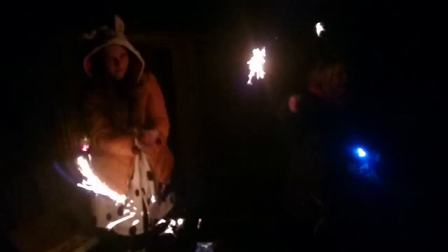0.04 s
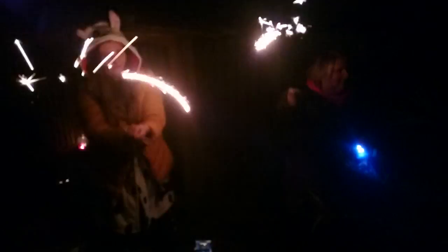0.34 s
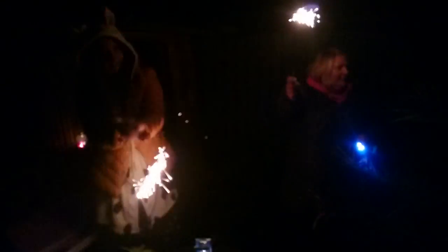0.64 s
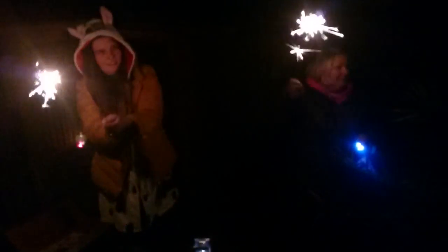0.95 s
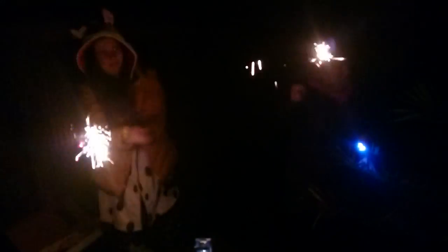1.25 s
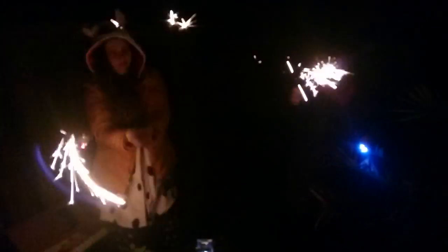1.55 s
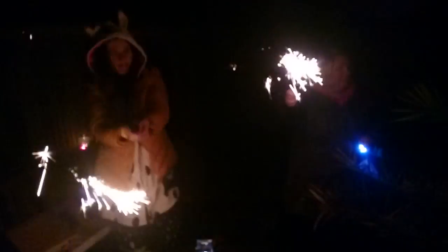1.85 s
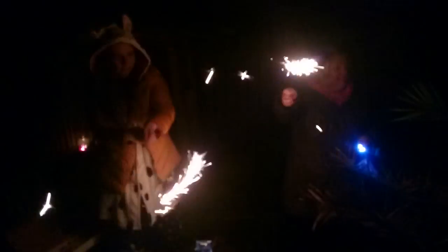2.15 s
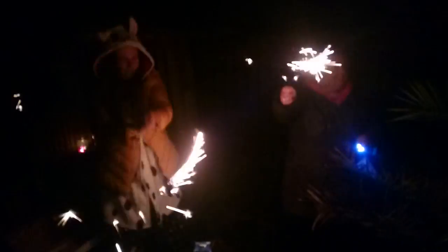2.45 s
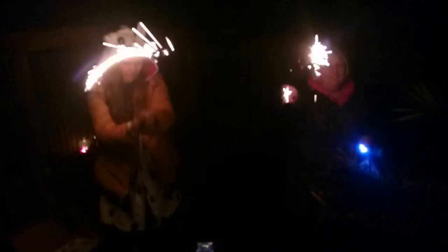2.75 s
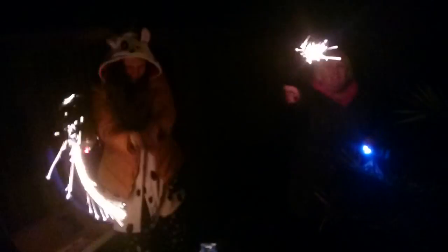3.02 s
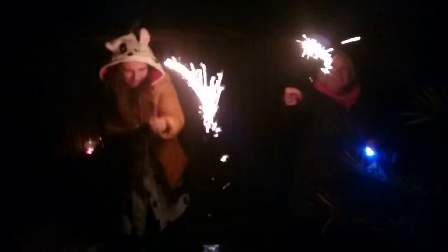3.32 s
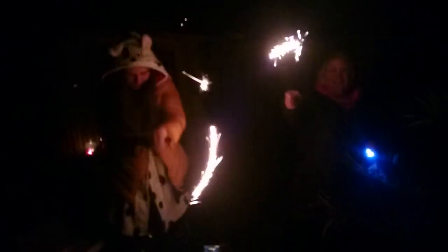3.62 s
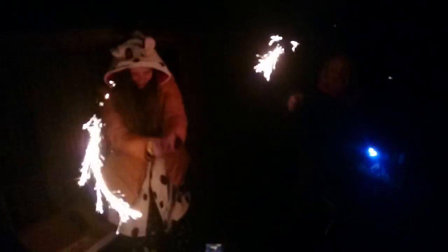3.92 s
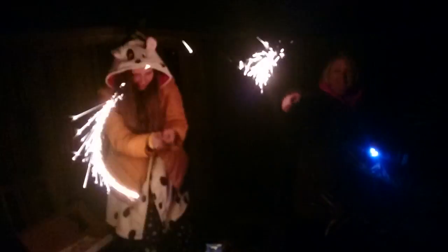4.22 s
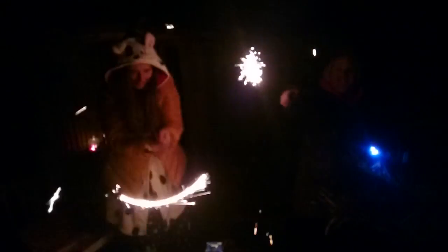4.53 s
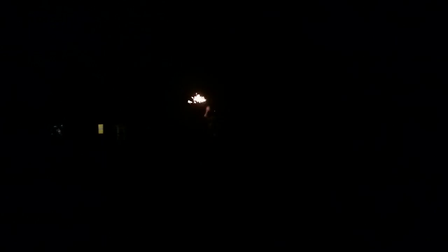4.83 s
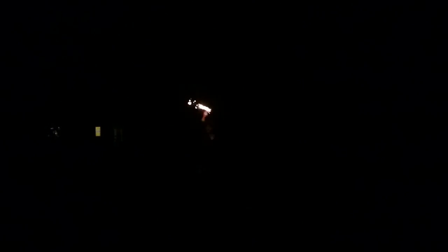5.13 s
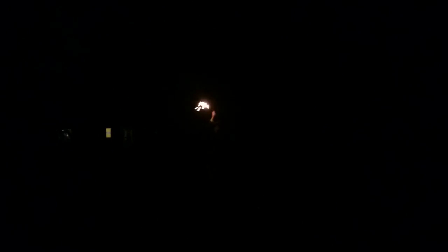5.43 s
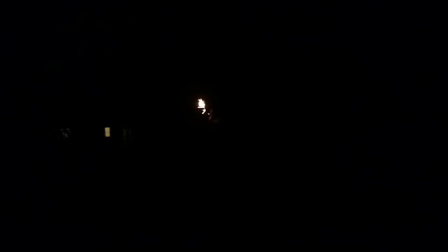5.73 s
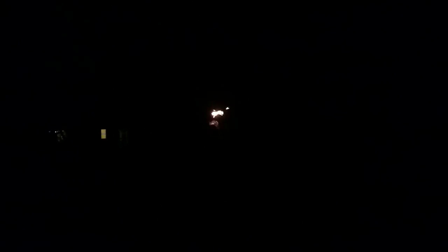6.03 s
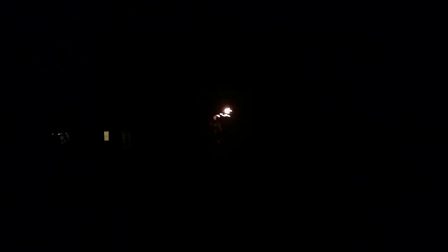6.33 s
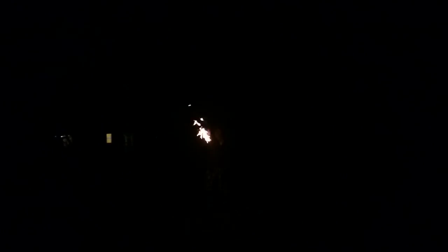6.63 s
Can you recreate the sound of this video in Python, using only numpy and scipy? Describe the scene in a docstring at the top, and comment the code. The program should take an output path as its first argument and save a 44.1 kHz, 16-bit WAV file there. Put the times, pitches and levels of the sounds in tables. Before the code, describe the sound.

Two sparklers fizz and crackle close by outdoors, with sharp little pops, then abruptly just one sputters further away.

```python
"""A garden at night, on a stereo microphone. Two hand-held sparklers burn close by: metal grains burst in
crackles and pops, and as the coating flares, gas rushes out and whistles through narrow vents. Then the scene
changes: one sparkler fizzes further off, with a few sharp pops. Distant traffic murmurs behind, light air
nudges the two microphone ports, and each port colours the sound in its own way."""
import sys
import numpy as np
from scipy import signal
from scipy.fft import rfft, irfft, next_fast_len
from scipy.io import wavfile

SR = 44100
rng = np.random.default_rng(int(sys.argv[2]) if len(sys.argv) > 2 else 0)


def bounce(signal):
    """Save signal as a 16-bit WAV file at the path given by the first command-line argument."""
    frames = np.transpose(np.atleast_2d(signal))
    limited = np.clip(frames, -1, 1)
    pcm = np.round(limited * 32767).astype(np.int16)
    wavfile.write(sys.argv[1], SR, pcm)


N = 294147
TIME = np.arange(N) / SR
CUT_S = 4.757   # the close scene gives way to the far one
CUTOFF_HZ = 15750   # top of the microphone's range
FIZZ_ATTACK_S, FIZZ_RELEASE_S = 0.0078, 0.021
JET_ATTACK_S, JET_RELEASE_S = 0.051, 0.12   # the gas builds and dies more slowly than the fizz

# Colour of the close sparklers at the ports: (frequency [Hz], left [relative dB], right [relative dB])
NEAR_COLOUR = [(1030, -31, -13), (1850, -16.5, -4.5), (2770, -14.5, -11.5), (3530, -9.5, -10),
               (4000, -17.5, -7), (4840, -18, -9), (5570, -9.5, -11.5), (6520, 0.5, -16.5), (6810, -3, -12),
               (7960, -5.5, -21.5), (9340, 1.5, -14.5), (10690, -10.5, -10), (11700, -15.5, -8.5),
               (13000, -25, -13), (16400, -21, -16)]


def near_sparklers():
    """Two sparklers close to the microphone: fizz, pops, and gas rushing in one broad resonance."""
    burn_db = flaring(-49.5, "fizz", FIZZ_ATTACK_S, FIZZ_RELEASE_S)
    jet_db = flaring(-63.5, "jet", JET_ATTACK_S, JET_RELEASE_S)
    ports = port_response(NEAR_COLOUR)
    burst = grains(low_hz=3480, split_hz=6500, per_s=2500, spread_db=9.5, largest=1.66, spurt_db=2.0)
    crackle = garden(burst, echo_db=-1.0, t60=0.47) * stereo_gain(0, -2)
    burning = fizz(burn_db, crackle, hiss_db=0.5, sputter_db=0.58)
    rows = [row for row in popping_sparks() if row[0] < CUT_S]
    popping = pops(rows, ports, top_hz=9000, echo_db=2.0, t60=0.11, lag_s=0.0001)
    rush = noise_band(centre_hz=3860, width_hz=1200)
    jet = rush * from_db(jet_db + drift(27)) * stereo_gain(-22, 0)
    return through(burning + popping, ports) + jet


# Colour of the far sparkler at the ports: (frequency [Hz], left [relative dB], right [relative dB])
FAR_COLOUR = [(990, -10, -6.5), (2030, -16.5, -1), (3020, -5.5, -6), (3560, -12, -0.8), (4860, -28, -2),
              (5360, -14.5, -5.5), (5860, -3.5, -11), (6730, 1.5, -10), (7600, -2.5, -19), (9360, -4, -9.5),
              (10200, -9, -10), (11600, -11.5, -5.5), (13100, -18, -7.5), (16300, -15, -17)]


def far_sparkler():
    """One sparkler further off: duller, with sparser crackle; its jet does not carry this far."""
    burn_db = flaring(-50, "fizz", FIZZ_ATTACK_S, FIZZ_RELEASE_S)
    ports = port_response(FAR_COLOUR)
    burst = grains(low_hz=1480, split_hz=4400, per_s=1800, spread_db=4.5, largest=4.0, spurt_db=5.0)
    crackle = garden(burst, echo_db=0.5, t60=0.23) * stereo_gain(-2.5, 0)
    burning = fizz(burn_db, crackle, hiss_db=4.0, sputter_db=0.5)
    rows = [row for row in popping_sparks() if row[0] >= CUT_S]
    popping = pops(rows, ports, top_hz=11100, echo_db=-11, t60=0.021, lag_s=.00005)
    return through(burning + popping, ports)


# Flares of the coating: (start [s], length [s], fizz level [dB], jet level [dB])
FLARES = [(0.05, 0.087, -52.5, -68), (0.17, 0.049, -53, -60), (0.33, 0.11, -48, -62),
          (0.38, 0.021, -47, -66), (0.476, 0.058, -52, -70), (0.613, 0.098, -51, -60),
          (0.743, 0.056, -47.5, -58), (.835, .04, -53, -66), (0.908, 0.049, -47, -66),
          (1.007, 0.026, -49.5, -68), (1.085, .03, -51, -68), (1.14, .025, -50.5, -64),
          (1.26, 0.12, -52, -65), (1.41, 0.079, -49.5, -53.5), (1.527, 0.2, -52.5, -65),
          (1.775, 0.11, -47.5, -55), (1.883, 0.097, -47, -51), (2.038, 0.035, -46, -64),
          (2.096, 0.084, -50.5, -57), (2.19, 0.086, -48, -54), (2.37, 0.18, -50.5, -55),
          (2.63, 0.12, -62, -72), (2.942, 0.12, -50.5, -55), (3.063, 0.21, -47.5, -55),
          (3.277, 0.086, -46.5, -63), (3.377, 0.079, -51.5, -56), (3.52, .17, -60, -61),
          (3.718, 0.23, -49.5, -61), (3.96, 0.3, -54, -59), (4.202, 0.35, -52.5, -58.5),
          (4.66, 0.084, -52.5, -66), (4.787, 0.17, -52.5, -74), (5.275, 0.12, -55.5, -70),
          (5.434, 0.033, -49, -70), (5.588, 0.079, -49.5, -70), (6.192, 0.16, -53, -70),
          (6.357, 0.29, -52, -70)]


def flaring(steady_db, part, attack_s, release_s):
    """Level in dB of the "fizz" or the "jet": each flare adds its power to the steady burn."""
    power = from_db(steady_db) ** 2
    for start_s, length_s, fizz_db, jet_db in FLARES:
        gain = from_db(fizz_db if part == "fizz" else jet_db)
        power = power + (gain * swell(start_s, length_s, attack_s, release_s)) ** 2
    return 10 * np.log10(power)


def fizz(burn_db, crackle, hiss_db, sputter_db):
    """Crackle over the smooth hiss of escaping gas; both sputter together."""
    hiss = from_db(hiss_db) * rng.standard_normal((2, N))
    return rms_one(crackle + hiss) * from_db(burn_db + sputter_db * drift(7.3))


def grains(low_hz, split_hz, per_s, spread_db, largest, spurt_db):
    """Coarse grains crack low and fine ones high, each in their own time; both radiate little bass."""
    coarse, fine = (sparks(per_s, spread_db, largest, spurt_db) for _ in range(2))
    both = low_pass(coarse, split_hz, order=1) + high_pass(fine, split_hz, order=1)
    return rms_one(high_pass(both, low_hz, order=1))


def sparks(per_s, spread_db, largest, spurt_db):
    """Metal grains burst at random, in spurts: countless tiny ones, fewer large."""
    at = np.flatnonzero(rng.random(N) < per_s * from_db(spurt_db * drift(50)) / SR)
    sizes_db = spread_db * np.minimum(rng.exponential(1, N), largest)
    clicks = (from_db(sizes_db) * rng.choice([-1, 1], N))[at]
    # sparks fly all ways, so each has its own lag between the ports
    lags = (rng.uniform(-.0004, .0004, N) * SR).astype(int)[at]
    out = np.zeros((2, N))
    out[0, at] = clicks
    out[1, np.clip(at + lags, 0, N - 1)] = clicks
    return rms_one(out)


# Loudest sparks: (time [s], direct peak at the louder port [dB], low edge [Hz], right over left [dB])
LOUD_POPS = [(.2537, -24, 7000, -12), (.4916, -24, 7000, -9), (.506, -29, 7000, -5),
             (0.5383, -27, 7000, -5), (0.845, -29, 5000, 1), (1.3389, -25, 7100, -3),
             (1.4002, -26, 9100, 3), (1.581, -23, 6900, -3), (1.5868, -30, 6900, -3),
             (1.6354, -25.5, 7000, -7), (1.6605, -24.5, 7000, -4), (2.1196, -27, 5000, 3),
             (2.1264, -30, 2010, 7), (2.2636, -28, 6000, -8), (2.272, -29.5, 1000, 8),
             (2.4024, -36, 7000, -6), (2.538, -25, 7000, -3), (3.0883, -24.5, 7000, -9),
             (3.1238, -29, 7000, -5), (3.386, -25, 7000, 2), (3.7954, -30, 5000, 4),
             (3.8337, -32, 6000, -6), (4.0104, -32, 7000, 3), (4.276, -32, 2000, 8),
             (4.4278, -27.5, 5000, 0), (4.6814, -23, 6500, 2), (4.8833, -28, 2200, 5),
             (5.029, -25.5, 6000, 4), (5.0546, -31, 5000, -4), (5.1898, -28.5, 2000, 13),
             (5.2358, -29.5, 2000, 3), (5.3738, -19.5, 1600, 3), (5.4568, -33, 3000, 5),
             (5.5838, -34, 900, -5), (5.6388, -27, 2000, -2), (6.0315, -36, 2500, 7),
             (6.1369, -26.5, 2600, 0), (6.3103, -26.5, 1800, 10), (6.4843, -37, 4000, 2),
             (6.5905, -31, 4000, -2), (6.6054, -27, 4000, 2)]


def popping_sparks(per_s=6, peak_db=-37, spread_db=1.2, low_hz=5000):
    """Rows for the loud pops, plus lesser sparks that burst at random with these settings."""
    at = np.flatnonzero(rng.random(N) < per_s / SR)
    peaks_db = peak_db + spread_db * rng.standard_normal(N)
    return LOUD_POPS + [(i / SR, peaks_db[i], low_hz, 0) for i in at]


def pops(rows, ports, top_hz, echo_db, t60, lag_s):
    """A large spark bursts with one rounded pressure spike; some are thin ticks, others reach lower."""
    out = np.zeros((2, N))
    spike = low_pass(signal.unit_impulse(SR // 200), top_hz, order=1)
    for time_s, peak_db, low_hz, right_db in rows:
        crack = high_pass(spike, low_hz) * stereo_gain(0, right_db)
        peak_at_ports = np.abs(signal.fftconvolve(crack, ports, axes=1)).max()
        add_at(out, time_s, from_db(peak_db) / peak_at_ports * crack)
    out[1] = np.roll(out[1], int(lag_s * SR))
    return garden(out, echo_db, t60)


# Gas whistling through narrow vents in the coating: (start [s], length [s], level [dB], pitch [Hz])
WHISTLES = [(0.314, 0.07, -47, 4100), (.46, 0.26, -55.5, 4330), (2.887, 0.19, -51, 4300),
            (3.06, 0.29, -49.5, 4295), (4.957, 0.091, -54, 14000)]


def whistles(overtone_ratio=2.3, overtone_db=-6):
    """Each vent sings in a narrow, wavering resonance on the right; a weak overtone reaches both ports."""
    out = 0
    waver = 1 + .012 * drift(14.3)
    for start_s, length_s, level_db, pitch_hz in WHISTLES:
        tone = noise_band(pitch_hz * waver, width_hz=0.18 * pitch_hz) * stereo_gain(-24, 0)
        overtone_hz = overtone_ratio * pitch_hz
        if overtone_hz < CUTOFF_HZ:
            tone = tone + from_db(overtone_db) * noise_band(overtone_hz * waver, width_hz=800)
        out = out + from_db(level_db) * swell(start_s, length_s, JET_ATTACK_S, JET_RELEASE_S) * tone
    return out


def garden(x, echo_db, t60):
    """Direct sound plus scatter from coats, ground and fence; moving sparks each have their own echoes."""
    retained = from_db(-60 / (t60 * SR)) ** 2   # share of the energy left after one sample
    energy = signal.lfilter([1 - retained], [1, -retained], np.square(x) + 1e-18)
    echoes = rms_one(rng.standard_normal((2, N)) * (rng.random((2, N)) < .2))
    return x + from_db(echo_db) * np.sqrt(energy) * echoes


# Distant cars: (time when nearest [s], level on the right [dB], time to cover their own distance [s],
# centre of the tyre noise [Hz], upper hiss against that noise [dB])
CARS = [(1.74, -53.5, .85, 928.6, -7), (4.5, -52.5, 1.2, 1049, -13.5)]


def tyres(fall_db_per_decade=43, glide=.05):
    """Far cars on the right: the road noise of each swells as it nears, then sinks in pitch and fades."""
    out = 0
    for nearest_s, level_db, pass_s, centre_hz, hiss_db in CARS:
        along = (TIME - nearest_s) / pass_s
        distance = np.hypot(1, along)   # 1 at the nearest point
        road = noise_band(centre_hz * (1 - glide * along / distance), width_hz=280)
        hiss = from_db(hiss_db) / distance ** 2 * noise_band(centre_hz=1710, width_hz=620)
        out = out + (road + hiss) * from_db(level_db - fall_db_per_decade * np.log10(distance))
    return out * stereo_gain(-13, 0)


# Night air and distant traffic behind the close pair, and behind the far sparkler:
# (frequency [Hz], left [relative dB], right [relative dB])
NIGHT_NEAR = [(25.0, -47, -29), (48.3, -8.5, -19.5), (88.5, -7.5, -10.5), (190, -18, -18),
              (242, -15.5, -12.5), (388, -16.5, -14), (513, -12.5, -9.5), (723, -12.5, -2),
              (1050, -9.5, -2.5), (1340, -12, -5), (1634, -10.5, -3.5), (1910, -21.5, -14.5),
              (3000, -21.5, -15), (6340, -41, -31.5)]
NIGHT_FAR = [(25, -36, -28), (50.0, 0, -15), (88.5, -2.5, -8), (182, -13.5, -12.5), (256, -13, -7),
             (387, -11, -14.5), (540, -12.5, -6), (700, -8, -0.8), (1060, -12, 0.5), (1210, -18, -4),
             (1480, -9, 1.5), (2040, -12, -9.5), (3170, -14, -23), (6130, -49, -25)]
# Likeness of the night air at the two ports: (frequency [Hz], correlation [-1 to 1])
PORT_LIKENESS = [(50, -0.67), (260, -0.84), (620, -0.6), (850, -0.42), (1050, 0.86), (1450, 0.69),
                 (1800, 0.47), (2250, -.95)]


def night(spectrum, level_db):
    """Steady outdoor murmur, partly alike and partly opposed in the two ports."""
    size = next_fast_len(N)
    alike = np.clip(at_hz(PORT_LIKENESS, bin_hz(size))[0], -.95, .95)
    mid, side = rfft(rng.standard_normal((2, size)))
    left_right = np.sqrt(1 + alike) * mid + np.sqrt(1 - alike) * side * [[1], [-1]]
    murmur = rms_one(irfft(left_right, size)[:, :N])
    return from_db(level_db) * through(murmur, port_response(spectrum))


# Air puffs and small knocks on the microphone housing: (time [s], left peak [dB], decay [s], top [Hz])
BUMPS = [(0.789, -59, .012, 150), (3.305, -57, 0.011, 284), (4.128, -54, 0.014, 80),
         (4.383, -56, 0.023, 100), (4.669, -42.5, 0.016, 276), (4.791, -56, 0.06, 75),
         (4.897, -59, .015, 85), (5.773, -57, .025, 85), (6.345, -58, .02, 110), (6.635, -55, 0.024, 90)]


def bumps():
    """Short low thuds right at the microphone, a push followed by a flutter, mostly at the left port."""
    out = np.zeros((2, N))
    t = TIME[:SR // 5]
    for time_s, peak_db, decay_s, top_hz in BUMPS:
        pressure = 0.038 * rng.standard_normal((2, len(t))) * np.exp(-t / decay_s)
        pressure[:, 0] = 1   # the push
        thud = high_pass(low_pass(pressure, top_hz, order=3), 52)
        add_at(out, time_s, from_db(peak_db) * thud / np.abs(thud).max(axis=1, keepdims=True))
    return out * stereo_gain(0, -9)


# Faint whine of the electronics: (frequency [Hz], level before the left and right gains [dB])
WHINE_TONES = [(14547, -77.5), (14577, -77.5)]


def whine():
    """Two thin, slightly unsteady tones from the electronics, stronger on the right."""
    out = 0
    for hz, level_db in WHINE_TONES:
        phase = 2 * np.pi * np.cumsum(hz + 5 * drift(11)) / SR
        out = out + from_db(level_db) * np.sin(phase)
    return out * stereo_gain(-5, 4)


def microphone_hiss(left_db, right_db):
    """Steady self-noise of the microphone's two channels."""
    return rng.standard_normal((2, N)) * stereo_gain(left_db, right_db)


def port_response(spectrum, size=4096):
    """Causal impulse responses of both ports for a spectrum that falls away past its ends."""
    hz = bin_hz(size)
    skirts = np.minimum(hz / spectrum[0][0], 1) ** 2 * np.minimum(spectrum[-1][0] / hz, 1) ** 2
    gain = rms_one(from_db(at_hz(spectrum, hz)) * skirts)
    cepstrum = irfft(np.log(gain + 1e-4))
    cepstrum[:, 1:size // 2] *= 2   # folding onto positive time gives minimum phase
    cepstrum[:, size // 2 + 1:] = 0
    return irfft(np.exp(rfft(cepstrum)))


def through(x, response):
    """Convolve with a stereo impulse response."""
    return signal.fftconvolve(x, response, axes=1)[:, :N]


def noise_band(centre_hz, width_hz):
    """Stereo noise in one resonance, whose centre may move."""
    swing = low_pass(rng.standard_normal((2, N)) + 1j * rng.standard_normal((2, N)), width_hz / 2)
    carrier = np.exp(2j * np.pi * np.cumsum(centre_hz * np.ones(N)) / SR)
    return rms_one(np.real(swing * carrier))


def swell(start_s, length_s, attack_s, release_s):
    """An envelope that catches, holds and dies away."""
    caught = 1 - np.exp(-np.maximum(TIME - start_s, 0) / attack_s)
    return caught * np.exp(-np.maximum(TIME - start_s - length_s, 0) / release_s)


def drift(rate_hz):
    """Slow random wander with spread 1."""
    return rms_one(low_pass(rng.standard_normal(N + SR), rate_hz)[SR:])


def low_pass(x, hz, order=2):
    """Butterworth low-pass."""
    return signal.sosfilt(signal.butter(order, hz, fs=SR, output="sos"), x)


def high_pass(x, hz, order=2):
    """Butterworth high-pass."""
    return signal.sosfilt(signal.butter(order, hz, "high", fs=SR, output="sos"), x)


def bin_hz(size):
    """Frequencies of a real FFT, kept at 1 Hz or more."""
    return np.maximum(np.arange(size // 2 + 1) * SR / size, 1)


def at_hz(rows, hz):
    """Each column of a spectrum at the given frequencies."""
    points, *columns = np.transpose(rows)
    return np.array([np.interp(np.log(hz), np.log(points), column) for column in columns])


def add_at(out, time_s, sound):
    """Mix a short stereo sound in at the given time."""
    start = int(time_s * SR)
    out[:, start:start + sound.shape[1]] += sound[:, :N - start]


def from_db(db):
    """Decibels to gain."""
    return 10 ** (np.asarray(db) / 20)


def stereo_gain(left_db, right_db):
    """One gain for each channel."""
    return from_db([[left_db], [right_db]])


def rms_one(x):
    """Scale to unit power."""
    return x / np.sqrt(np.mean(np.abs(x) ** 2) + 1e-20)


def scene():
    """The garden with two sparklers close to the microphone, then with one further off."""
    near = near_sparklers() + night(NIGHT_NEAR, level_db=-55.5) + tyres()
    far = far_sparkler() + night(NIGHT_FAR, level_db=-57.5)
    outdoors = np.where(TIME < CUT_S, near, far) + whistles()
    return outdoors + bumps() + whine() + microphone_hiss(left_db=-61.5, right_db=-58.0)


def record(dry):
    """The microphone's range: the deepest rumble is filtered off and the top is cut steeply."""
    top_cut = signal.ellip(12, .1, 70, CUTOFF_HZ, fs=SR, output="sos")
    return signal.sosfilt(top_cut, high_pass(dry, 36))


dry = scene()
out = record(dry)
bounce(out)
```